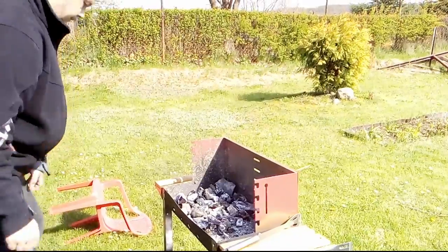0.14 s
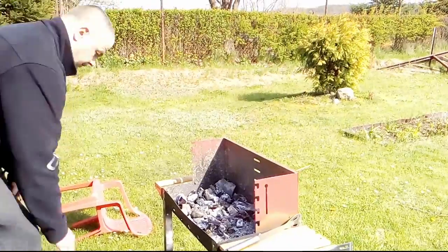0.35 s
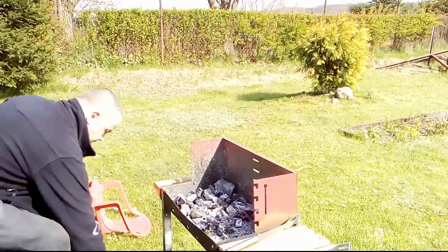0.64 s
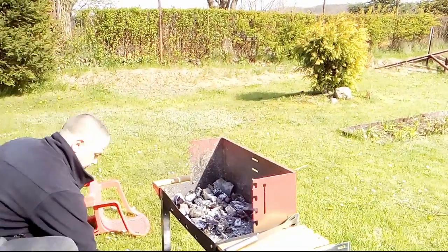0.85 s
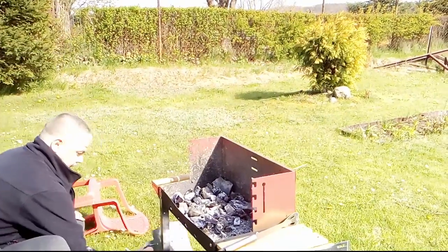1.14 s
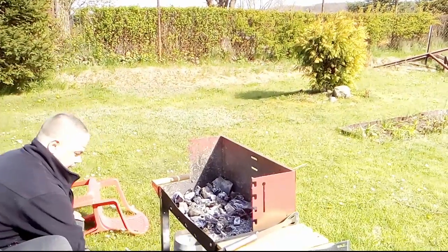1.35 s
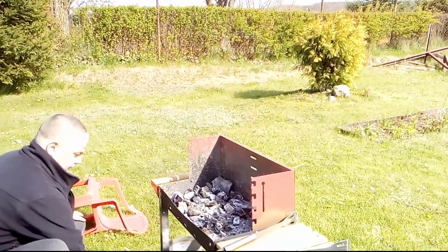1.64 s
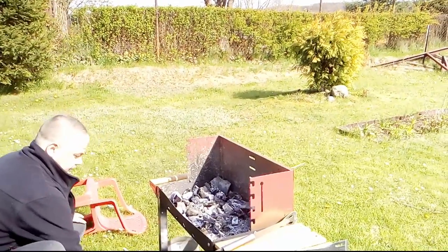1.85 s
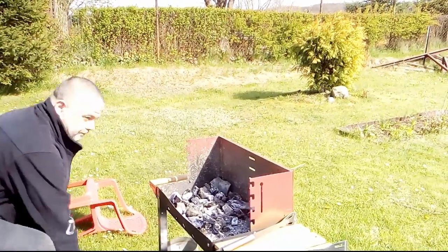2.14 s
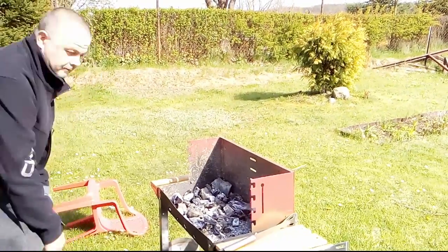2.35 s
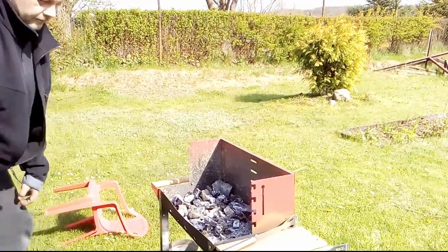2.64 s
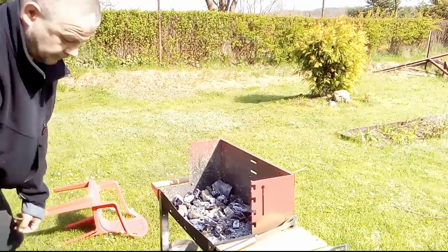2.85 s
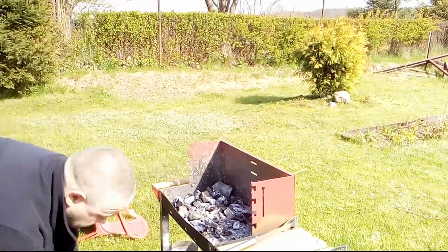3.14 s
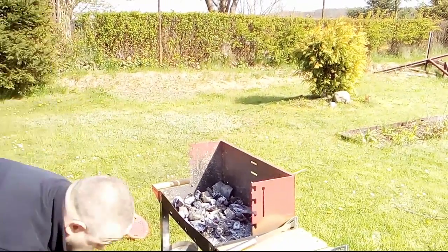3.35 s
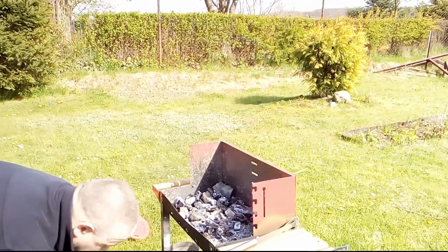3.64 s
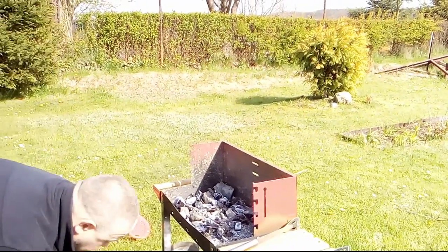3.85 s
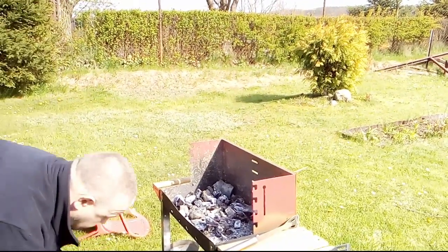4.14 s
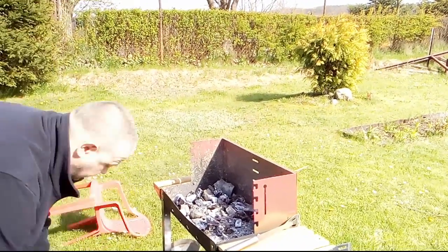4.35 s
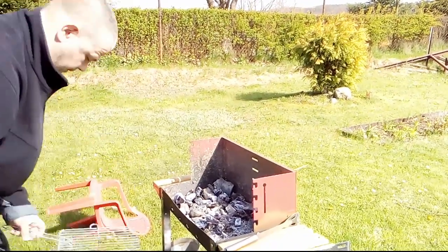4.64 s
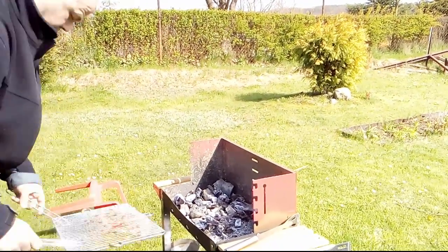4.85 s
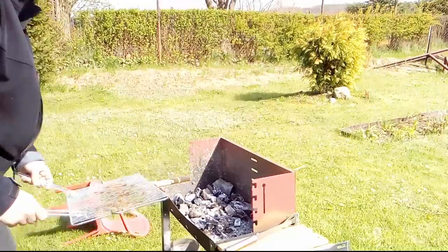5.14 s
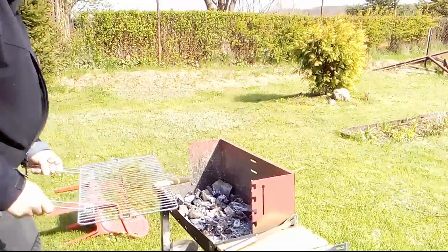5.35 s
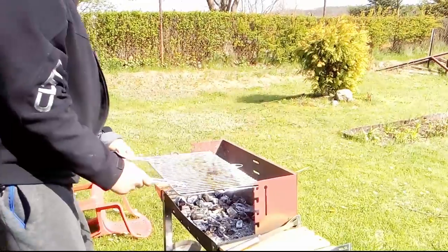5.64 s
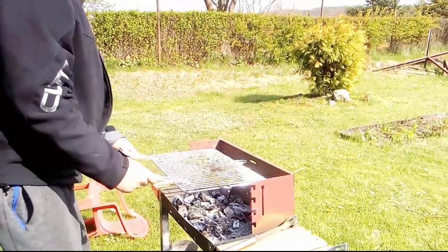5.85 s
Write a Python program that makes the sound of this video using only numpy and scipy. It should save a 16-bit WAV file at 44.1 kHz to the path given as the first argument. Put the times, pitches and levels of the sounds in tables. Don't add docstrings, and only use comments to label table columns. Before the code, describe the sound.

A small microphone stands about an arm's length from a sheet-steel grill in a breezy garden, with steady faint hiss and a barely audible high electronic whine. From 0 to 0.9 s charcoal lumps crunch and drag gritty and dry over steel, with tiny ember ticks. Between 0.85 and 1.1 s a gust bursts on the microphone in low, lumpy thumps. Short dull-metallic knocks follow at about 1.2, 1.5, 2.05 and 2.4 s, the last with a brief slide. A hard, sharp clank lands at 2.87 s with a little wind. From 2.9 to 4.1 s a far bird gives faint low whistles at 3.2 and 3.7 s between short, higher, lightly buzzed notes, over small taps. At 4.95 s the loudest blow bangs the pan and the wire grate chatters for under 0.2 s. After near quiet, a small knock at 5.75 s and a faint gritty slide end it. Echoes are short and dull.

```python
import sys
import numpy as np
from scipy import signal
from scipy.fft import rfft, irfft
from scipy.io import wavfile
from scipy.ndimage import uniform_filter1d

SR = 44100
rng = np.random.default_rng(int(sys.argv[2]) if len(sys.argv) > 2 else 0)


def persist_wave(psi):
    counts = np.round(np.clip(psi, -1, 1) * 32767).astype(np.int16)
    wavfile.write(sys.argv[1], SR, np.atleast_2d(counts).T)


def amplitude_ratio(level_db):
    exponent = np.asarray(level_db, float) / 20
    return 10 ** exponent


N = 264159

# start_s, peak_db, centre_hz, t60_s
CRUNCHES = [(.008, -34.5, 920, 0.13), (.04, -24.5, 900, 0.13), (0.0897, -24.5, 1480, 0.078),
            (.103, -31, 1100, 0.15), (.281, -29, 3530, .07), (.306, -36.5, 875, 0.32),
            (0.336, -29.5, 1250, 0.042), (.348, -32, 1230, 0.096), (0.375, -32.5, 2300, 0.095),
            (.493, -44, 1185, 0.023), (.617, -30, 2400, 0.039), (.701, -43.5, 2500, 0.44),
            (.833, -38, 1100, 0.056), (0.848, -37, 2500, 0.023), (.872, -31.5, 1500, .025)]
# start_s, peak_db, centre_hz, grit_db, t60_s
BLOWS = [(1.217, -26.5, 1970, -0.5, .11), (1.443, -42, 960, -13, .1), (1.5335, -24.5, 1710, 9.5, 0.052),
         (1.59, -49.5, 1500, -12, 0.089), (2.049, -30.5, 1830, -8, 0.13), (2.436, -30.5, 1260, 9, .17),
         (2.863, -38, 2180, -2, .05), (2.8659, -13.5, 2020, 4, 0.13), (2.969, -39, 1100, -14, 0.047),
         (3.107, -36, 926, -13.5, 0.046), (3.567, -47, 1110, -6, 0.1), (4.362, -50, 1470, -16, 0.13),
         (4.9536, -24.5, 3760, -6, 0.12), (4.96, -8, 1610, 8.5, 0.026), (4.956, -13, 1580, 17.5, 0.093),
         (5.735, -43, 2300, -12, 0.027), (5.7658, -33, 1770, -2, 0.025)]
# start_s, peak_db, t60_s
RATTLE = [(4.97, -23.5, .06), (4.991, -30.5, .08), (5.005, -22, 0.032), (5.013, -34, 0.032),
          (5.025, -31.5, 0.019), (5.058, -34.5, .022), (5.073, -42, 0.022), (5.0927, -32.5, 0.019),
          (5.098, -33.5, 0.1), (5.114, -28.5, .026), (5.123, -35, 0.015), (5.14, -40, .03)]
# pitch_hz, width_hz, level_db
PAN_WALLS = [(575, 38, 13), (1100, 13.7, 15), (1622, 17, 7.5), (2114, 11, 12), (2880, 190, 0),
             (3660, 91, 14), (3754, 57, 17.5), (2300, 57, -8), (4660, 20, 3), (5170, 38, -6), (3330, 19, 2),
             (6370, 72, 7.5)]
# start_s, peak_db, t60_s
TICKS = [(.0383, -61, .03), (.0902, -53, .04), (0.175, -51, .02), (.284, -49, 0.043), (0.378, -45, 0.048),
         (0.532, -49, .012), (0.6165, -43, 0.032), (.6968, -45.5, 0.065), (0.849, -50, .015),
         (1.216, -44, 0.083), (1.37, -48, .0091), (1.4009, -46, 0.0067), (1.5324, -63, .02),
         (2.0467, -37.5, 0.018), (2.437, -49, .04), (2.8664, -27.5, 0.058), (3.151, -44, .013),
         (3.4645, -54, .012), (4.9584, -27, 0.091), (4.973, -42, .04), (5.003, -55, .03),
         (5.013, -40.5, 0.014), (5.0724, -43, 0.01), (5.093, -51, 0.0097), (5.112, -51, .012),
         (5.9653, -52, .012)]
# start_s, length_s, level_db, grit_db, fade_db_per_s
DRAGS = [
    (0.019, 0.1, -46, -36, 22),
    (0.297, 0.088, -49, -7, -3),
    (.62, .17, -53, -2, 13),
    (0.836, 0.053, -51, -12, -26),
    (2.445, .13, -52.5, -21, 69),
    (2.902, 0.12, -49, -13, 90),
    (5, 0.048, -61, 1, 60),
    (5.092, 0.029, -58.5, -21, 10),
    (5.757, 0.035, -62.5, 5, 100),
    (5.884, 0.074, -61.5, -5, 10),
]
# crest_s, crest_db, rise_db_per_s, fall_db_per_s
GUSTS = [(.4, -59.5, 25, 20), (.62, -49, 69, 84), (.72, -54, 60, 60), (0.854, -30.5, 300, 162),
         (.905, -31, 150, 260), (.98, -43, 146, 300), (1.075, -37, 200, 520), (1.23, -55, 250, 55),
         (2.108, -58, 99, 180), (2.82, -45.5, 382, 142), (2.95, -46, 550, 132), (3.15, -51, 30, 73),
         (3.34, -47, 110, 80), (3.69, -58, 193, 82), (4.11, -58.5, 100, 160), (4.29, -60.5, 120, 100),
         (4.45, -61.5, 11, 35), (4.77, -55.5, 72, 200), (5.04, -60.5, 500, 75), (5.38, -57.5, 61, 130),
         (2.29, -63.5, 60, 120), (1.45, -62, 60, 52), (5.72, -64, 62, 36), (2.52, -65, 80, 40),
         (3.88, -61, 90, 26)]
# crest_s, peak_db, pitch_hz
EDDIES = [(.528, -43.5, 163), (1.0137, -32.5, 485), (1.014, -27, 178), (1.022, -28.5, 340),
          (1.032, -24, 153), (1.04, -38, 230), (1.052, -19, 334), (1.058, -24.5, 114), (2.116, -46, 123),
          (2.945, -39, 157), (2.953, -45, 150), (3.024, -42, 212), (3.081, -46.5, 134), (3.106, -43, 125),
          (3.336, -42.5, 217), (5.386, -47.5, 190)]
# pitch_hz, density_db (per Hz)
WIND_COLOUR = [(15, -32), (25, 5), (48, -9.5), (113, -9), (184, -13.5), (330, -26), (537, -33),
               (592, -27.5), (700, -33), (910, -105), (1540, -120)]
# start_s, length_s, pitch_hz, level_db
LOW_NOTES = [
    (3.166, .245, 3280, -62.5),
    (3.706, .225, 3245, -62),
]
# start_s, length_s, pitch_hz, level_db, slur_hz
HIGH_NOTES = [
    (2.94, .05, 4625, -68, 0),
    (3.48, .1, 4605, -67, 60),
    (3.995, .122, 4580, -70.5, 230),
]
# pitch_hz, density_db (per Hz)
HISS_COLOUR = [(25, -35), (60, -33), (139, -1), (238, 3), (436, 0.5), (696, -0.5), (2190, -6), (6250, -8.5),
               (7200, -14), (8270, -21), (13300, -21), (14800, -7.5), (15400, -12.5)]
# pitch_hz, level_db (rms)
WHINES = [
    (6449, -81),
    (12898, -96),
]
# pitch_hz, width_hz, gain_db
PORT = [
    (8010, 2480, -16.5),
    (10400, 7600, -15.5),
    (14730, 4200, 8.5),
]

CONTACT, WALL_LOSS_HZ = 9, 60
CRUNCH_GRIT_DB, WIRE_HZ, WIRE_GRIT_DB = -16.5, 3900, 9.5
CRUNCH_HOLD, BLOW_HOLD, WIRE_HOLD = .055, 0.098, 0.058
DRAG_RISE_DB_PER_S, DRAG_STOP_DB_PER_S = 802, 313
BREEZE_DB, BREEZE_SWAY_DB = -72.5, 6.5
EDDY_CYCLES = 0.6
LOW_SLUR_HZ, LOW_SLUR_S, HIGH_SLUR_S = 480, .017, .06
SWELL_S, FADE_DB_PER_S, NOTE_EDGE_DB_PER_S = .07, 80, 120
BUZZ_HZ, BUZZ_DEPTH = 210, 1.3
HISS_DB, STEADY_TOP_HZ = -59.5, 15500


def knocks():
    out, t = np.zeros(N), np.arange(8000) / SR
    rows = contacts()
    bursts = grit((len(rows), len(t)), per_s=4200.0, spread_db=6.5)
    touches_db = rng.normal(0, 3, (len(rows), len(PAN_WALLS)))
    for (s, peak_db, hz, grit_db, hold_s, t60), burst, touch_db in zip(rows, bursts, touches_db):
        fall_db = -60 * np.maximum(t - hold_s, 0) / max(t60, .01)
        force = burst * amplitude_ratio(fall_db)
        force[0] += CONTACT
        lump = rms_one(resonate(resonate(force, hz, 0.9 * hz), hz, 0.9 * hz))
        walls = rms_one(pan_walls(force, hz, touch_db))
        edge = rms_one(bright(force * amplitude_ratio(0.077 * fall_db)))
        hollow = rms_one(resonate(force, 359, 62)) + rms_one(resonate(force, 497, 87))
        sound = lump + amplitude_ratio(-2) * walls - amplitude_ratio(grit_db) * edge + amplitude_ratio(-19.0) * hollow
        add(out, s, amplitude_ratio(peak_db) * sound / np.max(np.abs(sound)))
    return out


def contacts():
    rows = [(s, db, hz, CRUNCH_GRIT_DB, CRUNCH_HOLD * t60, t60) for s, db, hz, t60 in CRUNCHES]
    rows += [(s, db, hz, grit_db, BLOW_HOLD * t60, t60) for s, db, hz, grit_db, t60 in BLOWS]
    rows += [(s, db, WIRE_HZ, WIRE_GRIT_DB, WIRE_HOLD * t60, t60) for s, db, t60 in RATTLE]
    return sorted(rows)


def pan_walls(force, centre_hz, touch_db):
    out = np.zeros(len(force))
    for k, (mode_hz, width_hz, mode_db) in enumerate(PAN_WALLS):
        distance_db = 7.8 * abs(np.log2(mode_hz / centre_hz))
        ring = resonate(force, mode_hz, width_hz + WALL_LOSS_HZ)
        out += (-1) ** k * amplitude_ratio(mode_db + touch_db[k] - distance_db) * ring
    return out


def grit(shape, per_s, spread_db):
    happens = rng.random(shape) < per_s / SR
    size_db = spread_db * np.minimum(rng.exponential(1, shape), 2.5)
    noise = rng.standard_normal(shape)
    return rms_one(happens * amplitude_ratio(size_db) * np.sign(noise) + 0.021 * noise)


def bright(x):
    band = signal.butter(2, [2600, 7500], "band", fs=SR, output="sos")
    return resonate(signal.sosfilt(band, x), 4700, 6900)


def drags():
    rub = grit(N, per_s=6000., spread_db=-2.0) * amplitude_ratio(3.0 * drift(52))
    body = rms_one(resonate(rub, 530, 1950))
    edge = rms_one(bright(rub)) + amplitude_ratio(-11) * rms_one(resonate(rub, 11000, 3000))
    hollow = amplitude_ratio(-12) * rms_one(resonate(resonate(rub, 344, 77), 344, 77))
    out, t = np.zeros(N), np.arange(N) / SR
    for s, length, level_db, grit_db, fade in DRAGS:
        stroke_db = level_db - fade * np.clip(t - s, 0, length)
        stroke_db -= DRAG_RISE_DB_PER_S * np.maximum(s - t, 0)
        stroke_db -= DRAG_STOP_DB_PER_S * np.maximum(t - s - length, 0)
        out += amplitude_ratio(stroke_db) * (body + hollow + amplitude_ratio(grit_db) * edge)
    return out


def ticks():
    out, t = np.zeros(N), np.arange(4000) / SR
    for s, peak_db, t60 in TICKS:
        crack = rng.standard_normal(len(t)) * amplitude_ratio(-60 * t / max(t60, .003))
        top = through_port(resonate(crack, 9650, 4700))
        sound = top + amplitude_ratio(-11.5) * resonate(crack, 5700, 2200)
        add(out, s, amplitude_ratio(peak_db) * sound / np.max(np.abs(top)))
    return out


def wind():
    lumps = coloured(WIND_COLOUR) * amplitude_ratio(1.3 * drift(20.6))
    lumps = lumps / np.sqrt(uniform_filter1d(lumps ** 2, size=3000) + 0.25)
    breeze_db = BREEZE_DB + BREEZE_SWAY_DB * drift(1.3)
    level_db = np.max([tent(*row) for row in GUSTS] + [breeze_db], axis=0)
    out = uniform_filter1d(amplitude_ratio(level_db), size=300) * rms_one(lumps)
    t = np.arange(-1500, 1500) / SR
    for s, peak_db, hz in EDDIES:
        push = np.cos(2 * np.pi * hz * t) * np.exp(-(t * hz / EDDY_CYCLES) ** 2)
        add(out, s + t[0], amplitude_ratio(peak_db) * push)
    return out


def bird():
    out, t = np.zeros(N), np.arange(N) / SR
    flutter = amplitude_ratio(2.5 * drift(90) + 2.8 * np.sin(2 * np.pi * 26 * t + 1.5 * drift(5)))
    waver = 1 + .005 * drift(150)
    buzz = np.sin(2 * np.pi * BUZZ_HZ * t + 3 * drift(25))
    notes = []
    for row in LOW_NOTES:
        swell_db = tent(row[0] + SWELL_S, 0, NOTE_EDGE_DB_PER_S, FADE_DB_PER_S)
        notes.append((*row, LOW_SLUR_HZ, LOW_SLUR_S, swell_db, 0))
    for row in HIGH_NOTES:
        notes.append((*row, HIGH_SLUR_S, 0, BUZZ_DEPTH * row[4] / 260))
    for s, length, hz, level_db, slur_hz, slur_s, shape_db, depth in notes:
        pitch = waver * (hz + slur_hz * np.exp(-np.maximum(t - s, 0) / slur_s))
        sounding = (t > s) * (t < s + length)
        level = uniform_filter1d(amplitude_ratio(level_db + shape_db) * sounding, size=300)
        tone = np.sqrt(2) * np.sin(2 * np.pi * np.cumsum(pitch) / SR)
        out += level * flutter * (1 + depth * buzz) * tone
    add(out, .035, amplitude_ratio(-13) * out.copy())
    return out


def hiss():
    t = np.arange(N) / SR
    out = amplitude_ratio(HISS_DB) * coloured(HISS_COLOUR) * amplitude_ratio(0.51 * drift(9.9))
    for hz, level_db in WHINES:
        out += amplitude_ratio(level_db) * np.sqrt(2) * np.sin(2 * np.pi * hz * t)
    return out


def through_port(x):
    for hz, width_hz, gain_db in PORT:
        a, w = amplitude_ratio(gain_db / 2), 2 * np.pi * hz / SR
        q = np.sin(w) * width_hz / hz / 2
        turn = -2 * np.cos(w)
        x = signal.lfilter([1 + q * a, turn, 1 - q * a], [1 + q / a, turn, 1 - q / a], x)
    return x


def rms_one(x):
    return x / np.sqrt(np.mean(x ** 2) + 1e-20)


def coloured(spectrum):
    hz, level_db = np.transpose(spectrum)
    log_hz = np.log(np.arange(N // 2 + 1) * SR / N + 1)
    gain = amplitude_ratio(np.interp(log_hz, np.log(hz), level_db))
    return rms_one(irfft(rfft(rng.standard_normal(N)) * gain, N))


def drift(rate_hz):
    r = np.exp(-2 * np.pi * rate_hz / SR)
    return rms_one(signal.lfilter([1], [1, -2 * r, r * r], rng.standard_normal(N + SR))[SR:])


def resonate(x, hz, width_hz):
    r = np.exp(-np.pi * width_hz / SR)
    poles = [1, -2 * r * np.cos(2 * np.pi * hz / SR), r * r]
    return signal.lfilter([(1 - r * r) / 2, 0, (r * r - 1) / 2], poles, x)


def tent(crest_s, crest_db, rise_db_per_s, fall_db_per_s):
    t = np.arange(N) / SR - crest_s
    return crest_db + np.minimum(abs(rise_db_per_s) * t, -abs(fall_db_per_s) * t)


def add(out, s, sound):
    at = round(s * SR)
    out[at:at + len(sound)] += sound[:N - at]


def scene():
    top_cut = signal.ellip(8, .5, 60, STEADY_TOP_HZ, fs=SR, output="sos")
    grill = through_port(knocks() + signal.sosfilt(top_cut, drags())) + ticks()
    dull = signal.lfilter([.4], [1, -.6], grill)
    for delay_s, echo_db in ((.004, -23), (.023, -14.5)):
        add(grill, delay_s, amplitude_ratio(echo_db) * dull)
    low_cut = signal.butter(4, 62, "high", fs=SR, output="sos")
    mix = grill + signal.sosfilt(low_cut, wind()) + bird() + signal.sosfilt(top_cut, hiss())
    return mix[None]


def roll_off(x):
    return signal.sosfilt(signal.butter(12, 16810, fs=SR, output="sos"), x)


def record(dry):
    top_cut = signal.cheby2(10, 60, 16900, fs=SR, output="sos")
    mix = signal.sosfilt(top_cut, dry)
    return roll_off(mix)


dry = scene()
out = record(dry)
persist_wave(out)
```